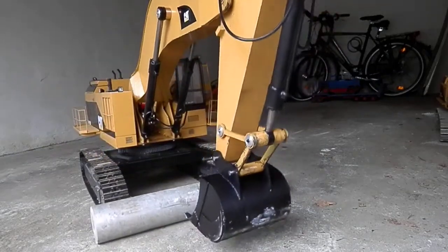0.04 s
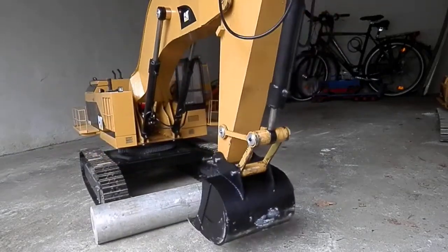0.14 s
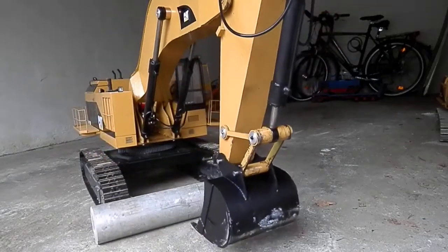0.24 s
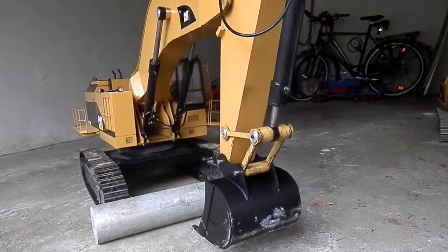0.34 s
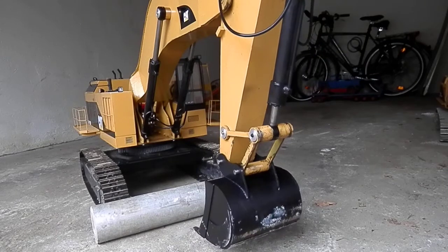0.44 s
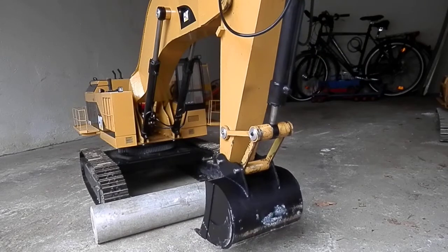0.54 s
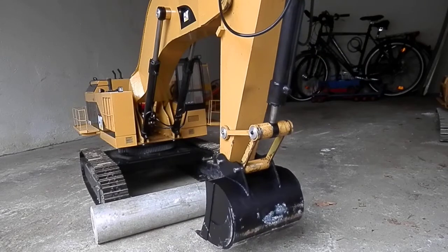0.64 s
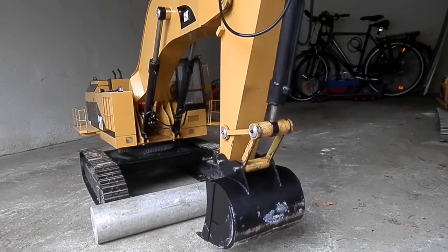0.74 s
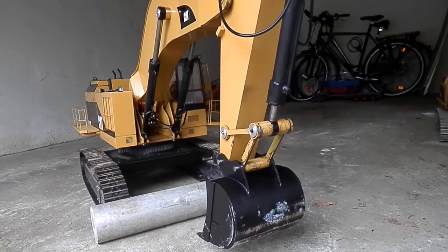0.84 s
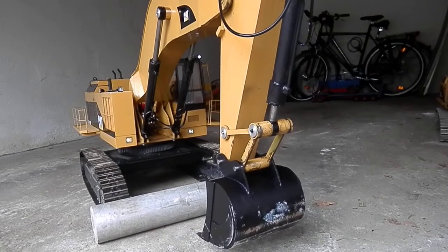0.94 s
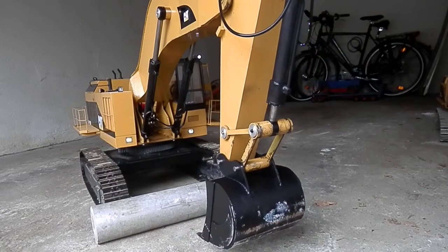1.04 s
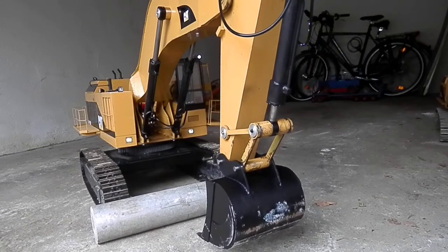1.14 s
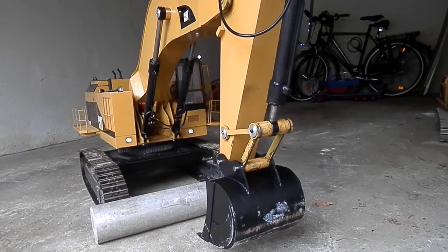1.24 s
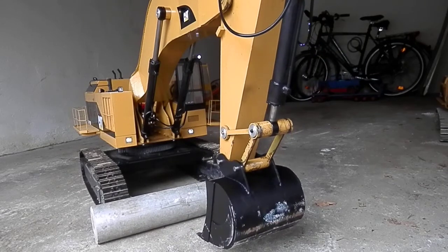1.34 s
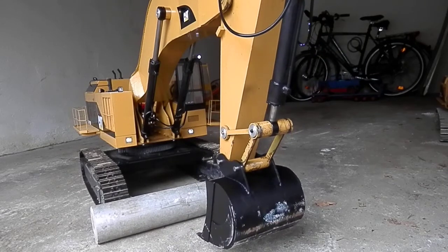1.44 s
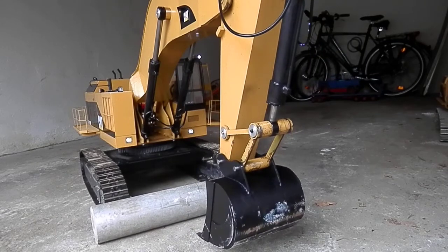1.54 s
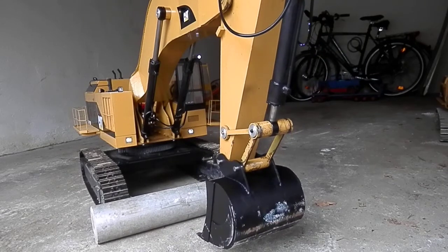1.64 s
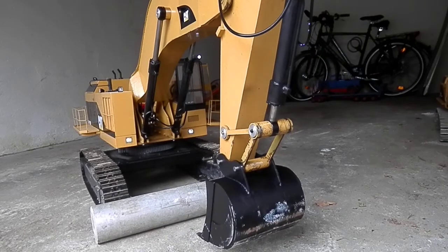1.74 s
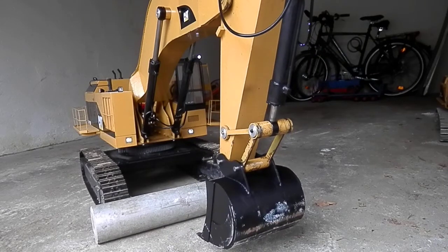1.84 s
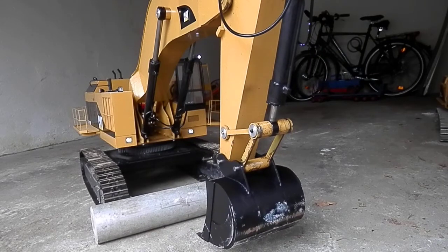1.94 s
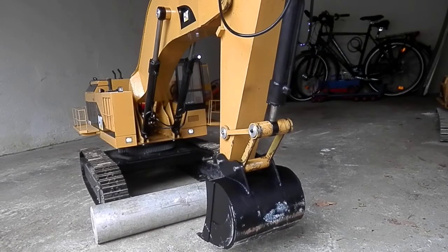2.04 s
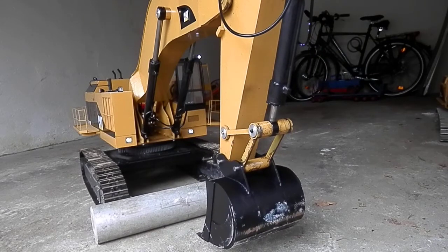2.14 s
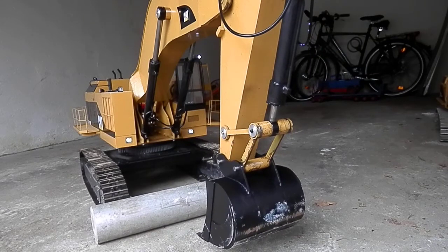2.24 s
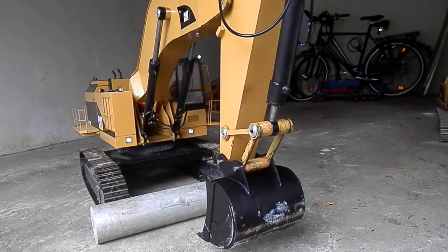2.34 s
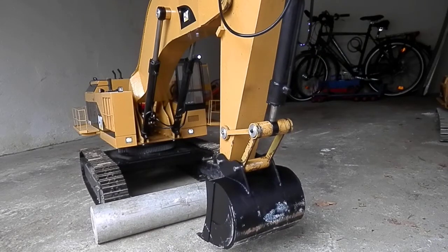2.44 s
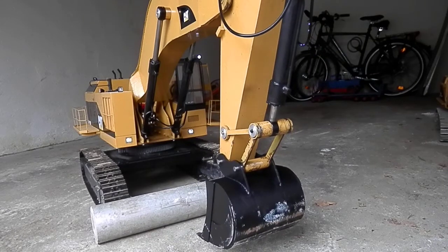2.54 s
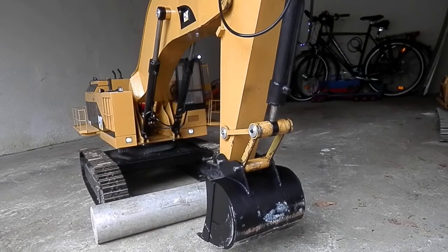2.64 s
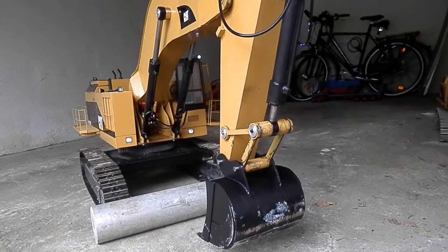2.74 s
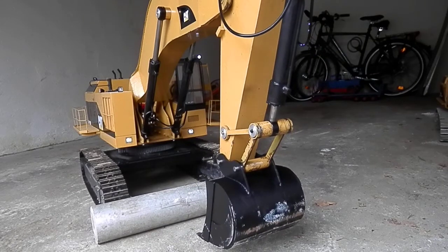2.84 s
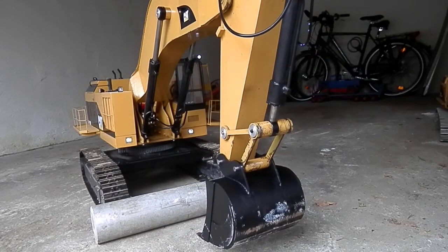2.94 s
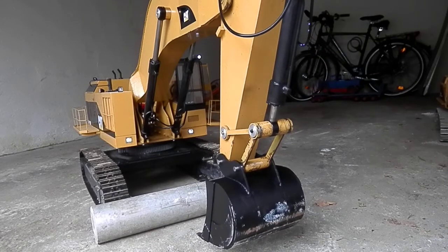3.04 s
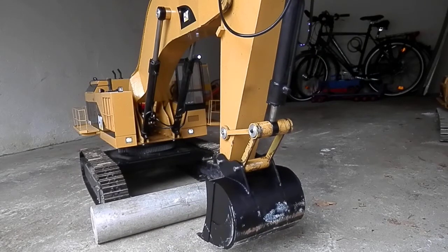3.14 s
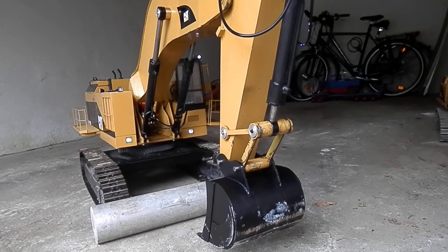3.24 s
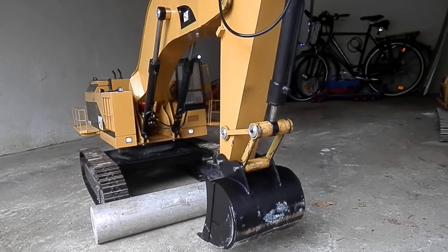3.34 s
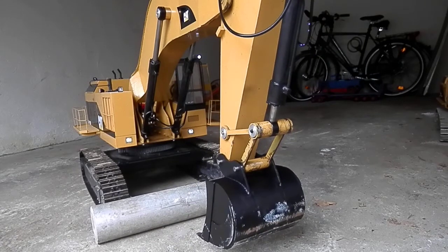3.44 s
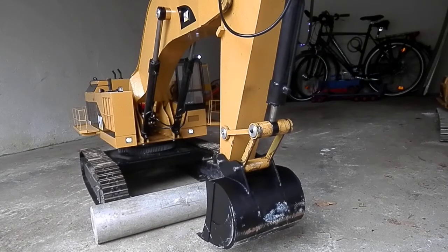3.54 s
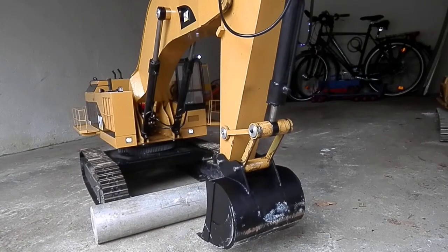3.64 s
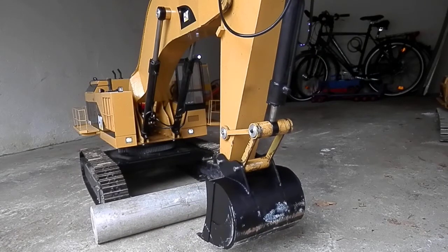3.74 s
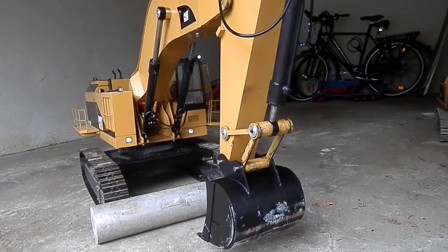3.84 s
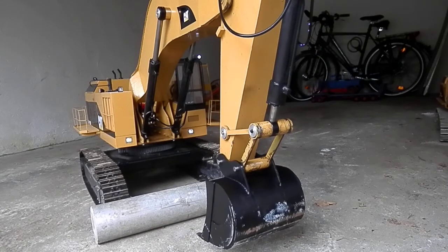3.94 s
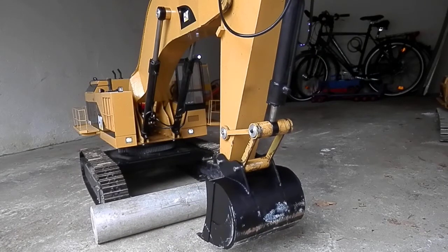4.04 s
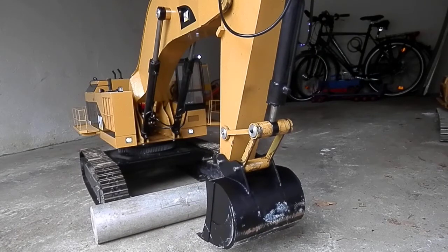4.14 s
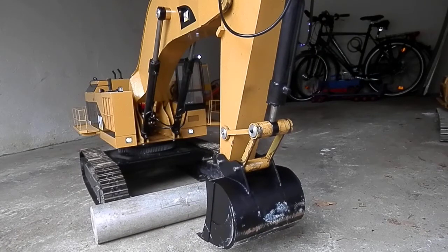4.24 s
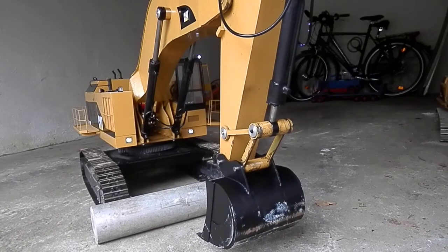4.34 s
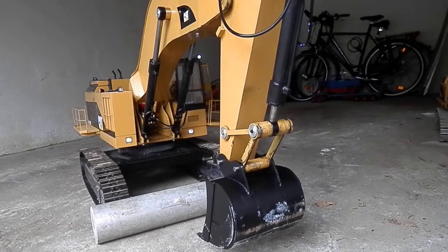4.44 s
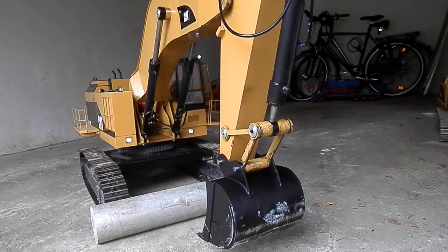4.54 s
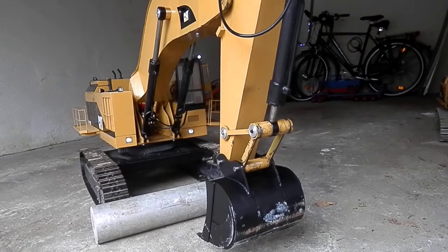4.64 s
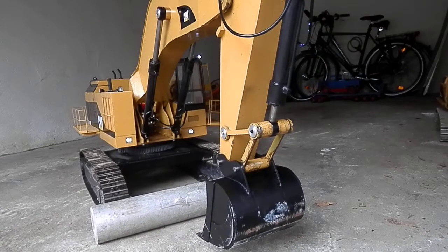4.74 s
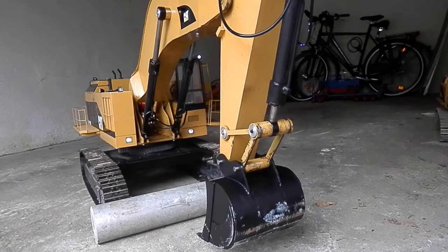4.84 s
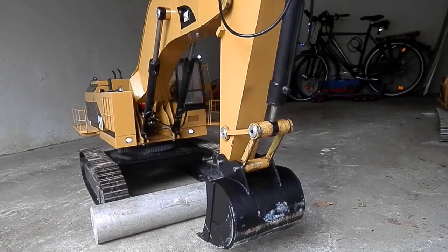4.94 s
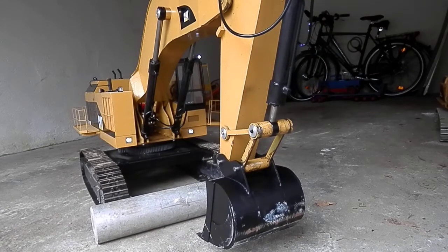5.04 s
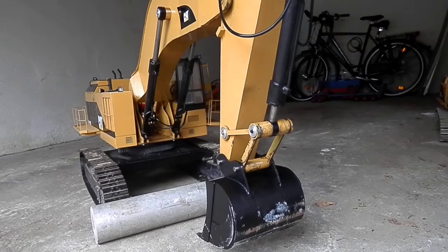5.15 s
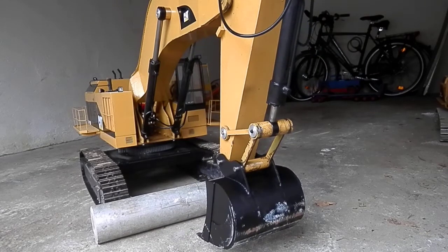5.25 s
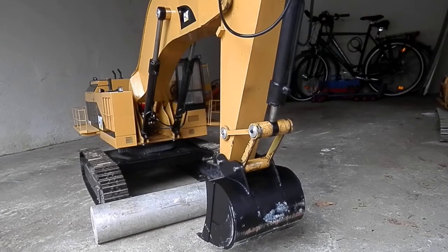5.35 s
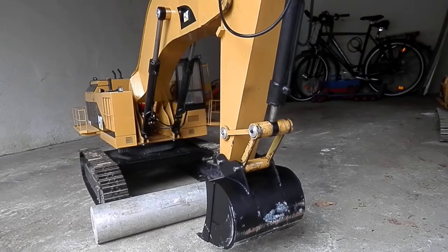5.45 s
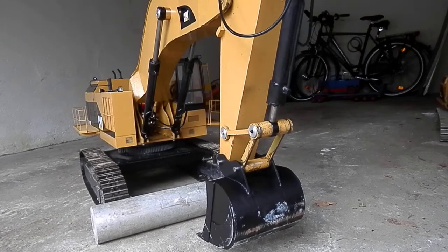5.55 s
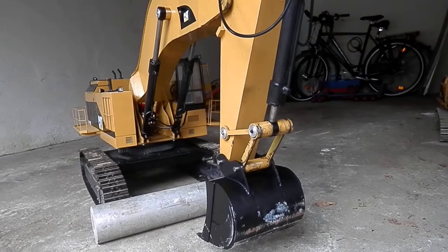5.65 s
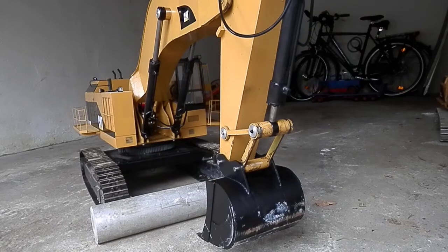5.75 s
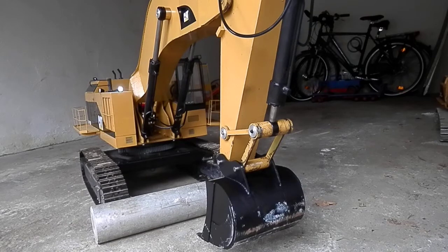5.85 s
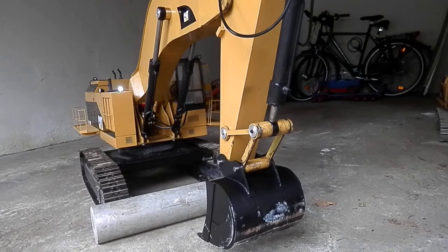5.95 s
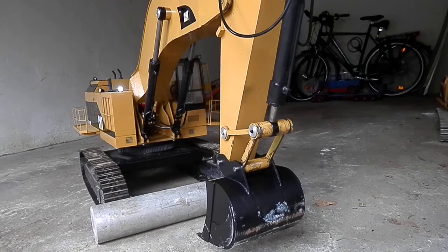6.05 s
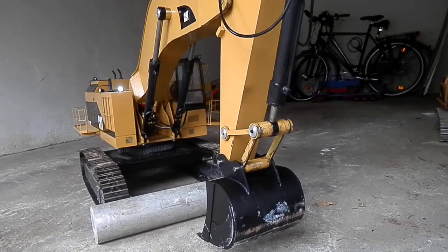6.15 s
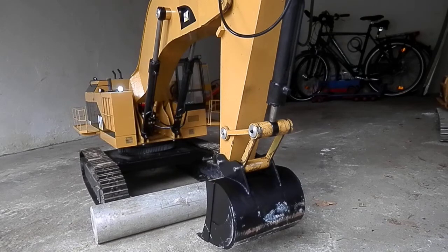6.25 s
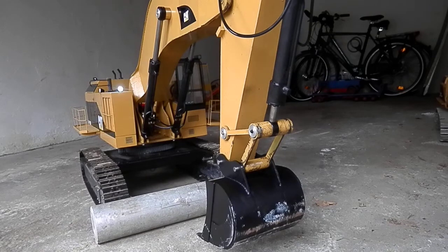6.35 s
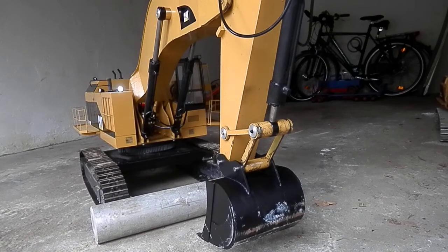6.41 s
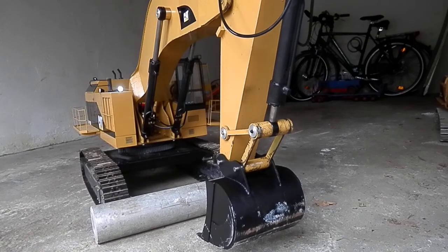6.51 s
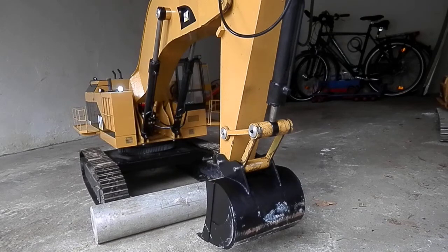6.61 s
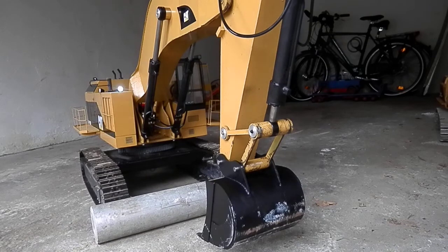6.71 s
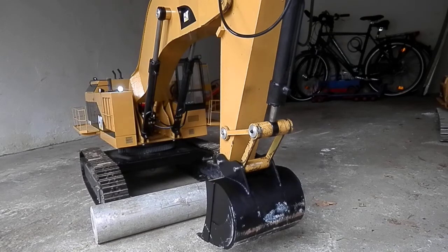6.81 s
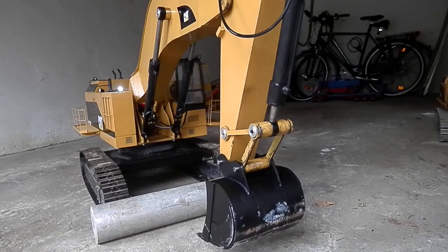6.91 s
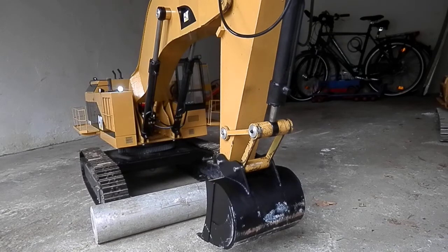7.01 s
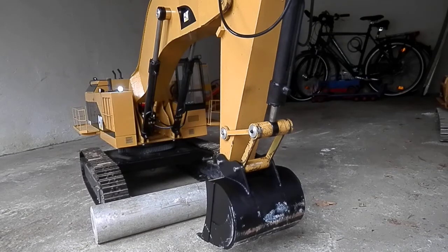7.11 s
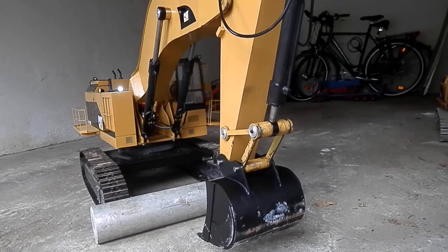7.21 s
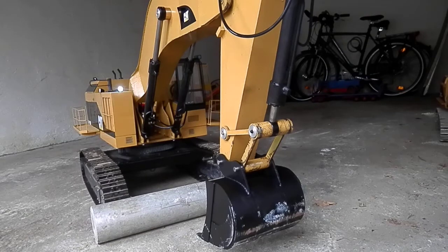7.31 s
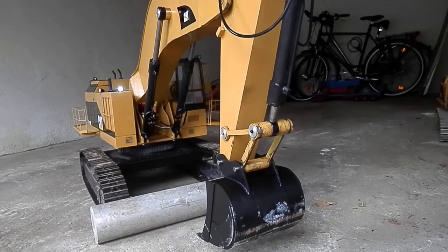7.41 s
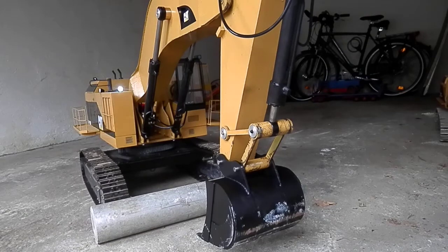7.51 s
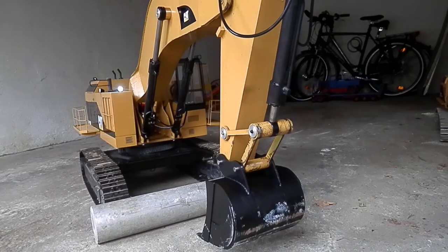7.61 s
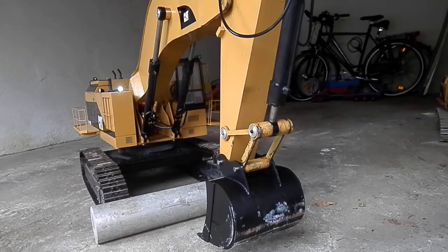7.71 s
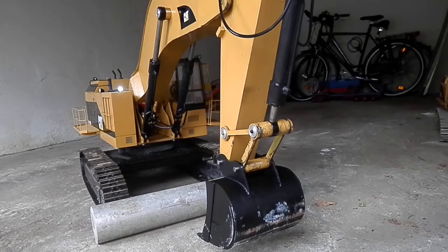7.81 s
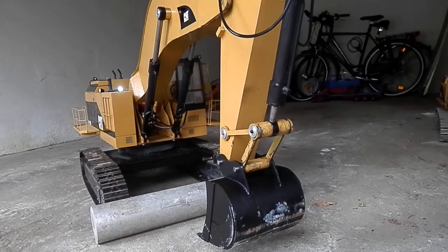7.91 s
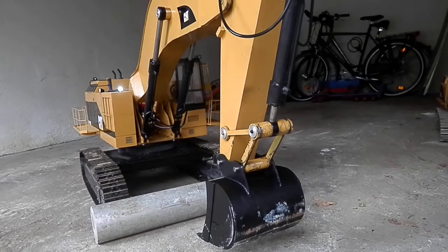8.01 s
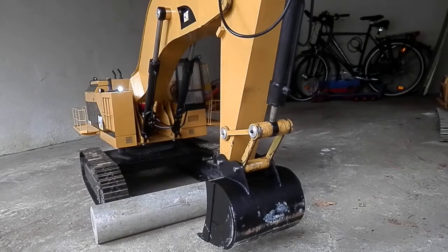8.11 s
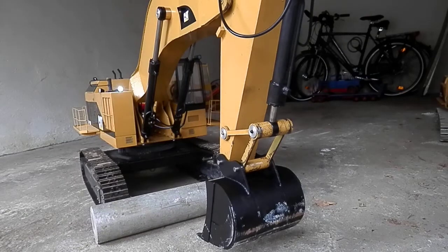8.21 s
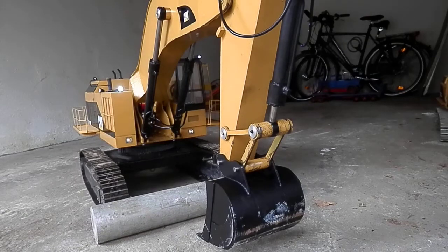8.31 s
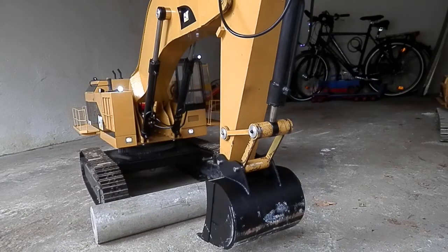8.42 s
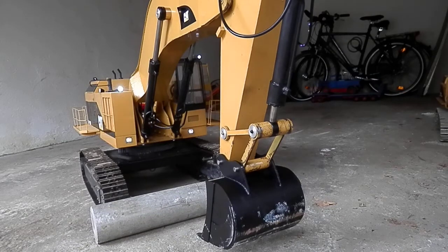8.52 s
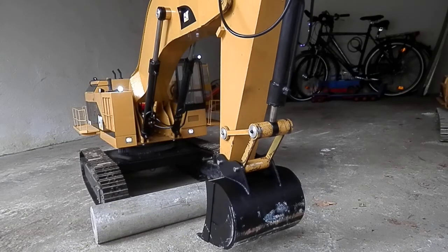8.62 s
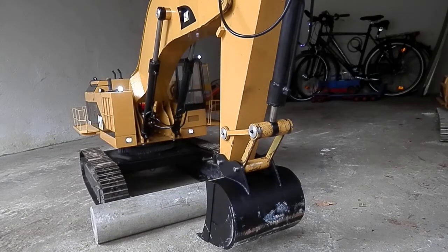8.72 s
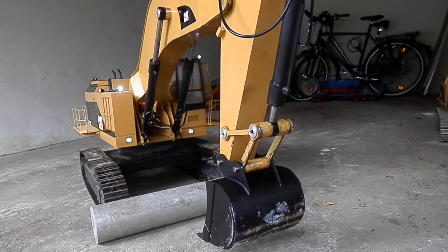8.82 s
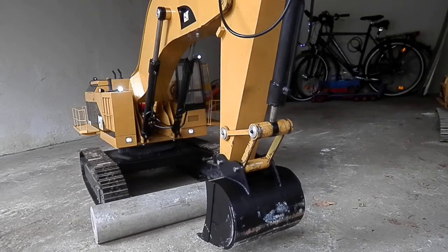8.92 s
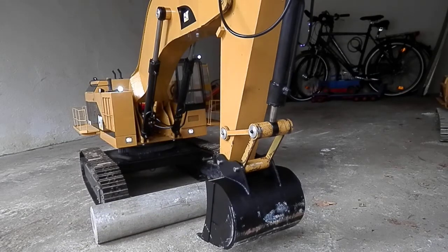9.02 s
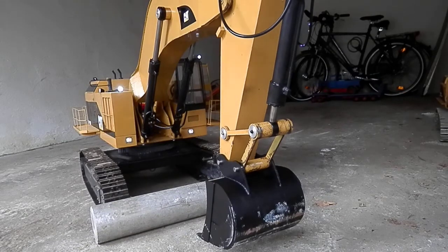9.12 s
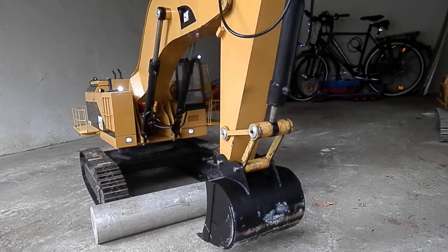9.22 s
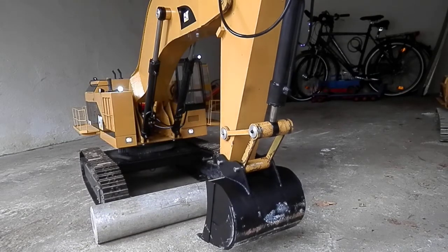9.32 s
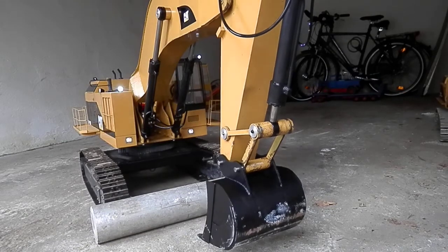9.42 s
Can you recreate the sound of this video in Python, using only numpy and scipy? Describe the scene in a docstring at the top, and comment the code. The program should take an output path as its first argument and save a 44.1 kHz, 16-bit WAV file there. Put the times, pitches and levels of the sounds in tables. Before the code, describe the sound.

A radio-controlled excavator whines and hisses, clonks once and coasts to a stop, then its cooling fan hums on under scattered light knocks.

```python
"""A bare garage, with a radio-controlled model excavator in it. Its hydraulic pump whines under load,
motor and gear tones locked to one shaft, while oil rushes and the steel bucket clonks once; then the
pump coasts to a stop. Relieved of the load, the battery lets a seven-bladed cooling fan speed up and
hum on. Light clicks, knocks and a scuff follow over a low rumble, birds chirp far away, and at the
end the pump begins to creep again."""
import sys
import numpy as np
from scipy import signal
from scipy.fft import rfft, irfft, next_fast_len
from scipy.io import wavfile
from scipy.ndimage import uniform_filter1d, minimum_filter1d

SR = 44100
rng = np.random.default_rng(int(sys.argv[2]) if len(sys.argv) > 2 else 0)


def waveform_to_disk(signal):
    """Save audio, clipped to [-1, 1], as 16-bit WAV at the path in sys.argv[1]."""
    frames = np.transpose(np.atleast_2d(signal))
    scaled = np.clip(frames, -1, 1) * 32767
    samples = np.round(scaled).astype(np.int16)
    wavfile.write(sys.argv[1], SR, samples)


N = 417627

# the load bites, the drive lets go, the valve shuts, the shaft stands, the pump creeps again
BITE_S, RELEASE_S, VALVE_SHUT_S, STANDSTILL_S, CREEP_S = 0.31, 1.098, 1.247, 1.764, 9.125
WORKING_HZ = 115.7  # pump shaft rate under load
FAN_BLADES, FAN_FREE_HZ = 7, 229.8  # blade-passing rate with the battery unloaded
# spectrum of the fan's rush and whirr: (frequency [Hz], relative level [dB])
AIR_SPECTRUM = [(115, -2), (165, -2), (270, 8), (340, 2.5), (450, -4.5), (540, -1), (670, -6), (850, -14.5),
                (1400, -24.5), (1850, -34), (2130, -30), (2350, -32.5), (2600, -33.5), (3500, -41),
                (5300, -39.5), (7500, -36), (10000, -58.5), (15000, -40)]
# bright spectrum of rubbing and snapping contacts: (frequency [Hz], relative density [dB])
CONTACT_SPECTRUM = [(880, -31), (1500, -4), (3000, 0.5), (5090, -8), (7090, -2.5), (8790, -3), (11000, -20),
                    (13400, -13.5), (15500, -12.5)]


def from_db(db):
    """Decibels to amplitude ratio."""
    return 10 ** (np.asarray(db) / 20)


def rms_one(x):
    """Normalise to rms 1."""
    return x / np.sqrt(np.mean(x ** 2) + 1e-20)


def seconds():
    """Time of every sample."""
    return np.arange(N) / SR


def since(start_s):
    """Seconds elapsed since a moment; 0 before it."""
    return np.maximum(seconds() - start_s, 0)


def ramp(start_s, length_s):
    """Linear rise from 0 to 1, then constant."""
    return np.minimum(since(start_s) / max(length_s, 1e-3), 1)


def held(start_s, end_s, attack_s, fade_db_per_s):
    """Envelope of linear attack, hold and exponential decay."""
    return ramp(start_s, attack_s) * from_db(-fade_db_per_s * since(end_s))


def decay(age, t60):
    """Exponential damping: 60 dB down after t60 seconds."""
    return np.exp(-np.log(1000) * age / t60)


def drift(rate_hz, size=N):
    """Random modulation: low-passed noise of rms 1."""
    r = np.exp(-80 * np.pi * rate_hz / SR)
    slow = signal.lfilter([1], [1, -2 * r, r * r], rng.standard_normal(size // 40 + 2002))[2000:]
    return np.interp(np.arange(size) / 40, np.arange(len(slow)), rms_one(slow))


def angle(hz):
    """Phase as the integral of frequency."""
    return 2 * np.pi * np.cumsum(hz) / SR


def noise(spectrum, low=15, high=SR / 2):
    """Spectrally shaped noise between two band edges in Hz; rms 1."""
    size = next_fast_len(N)
    hz = np.arange(1, size // 2 + 2) * SR / size
    point_hz, point_db = np.transpose(spectrum)
    gain = from_db(np.interp(np.log(hz), np.log(point_hz), point_db))
    gain /= np.sqrt((1 + (low / hz) ** 12) * (1 + (hz / high) ** 12))
    return rms_one(irfft(rfft(rng.standard_normal(size)) * gain, size)[:N])


def strikes(times, levels_db):
    """Impulsive excitation: one click for each contact."""
    out = np.zeros(N) + 1e-18
    out[(np.array(times) * SR).astype(int)] = from_db(levels_db)
    return out


def ring(clicks, hz, t60):
    """Free vibration of one mode: each impulse starts a damped sine."""
    r, w = from_db(-60 / (t60 * SR)), 2 * np.pi * hz / SR
    return signal.lfilter([0, np.sin(w)], [1, -2 * r * np.cos(w), r * r], clicks)


def resonate(x, modes):
    """Forced vibration of parallel modes: (frequency [Hz], bandwidth [Hz], peak gain [dB])."""
    out = 0
    for hz, width, db in modes:
        r = np.exp(-np.pi * width / SR)
        feedback = [1, -2 * r * np.cos(2 * np.pi * hz / SR), r * r]
        out = out + from_db(db) * signal.lfilter(np.array([1, 0, -1]) * (1 - r * r) / 2, feedback, x)
    return out


def glides(rows, warble, ragged_db, bend=1):
    """Short swelling sweeps with random frequency and amplitude modulation."""
    out, t = np.zeros(N), seconds()
    unsteady = bend + warble * drift(70)
    for s, length, start_hz, end_hz, db in rows:
        span = np.flatnonzero((t > s) & (t < s + length))
        hz = np.linspace(start_hz, end_hz, len(span)) * unsteady[span]
        out[span] += from_db(db) * np.hanning(len(span)) * np.sin(angle(hz))
    return np.sqrt(2) * out * from_db(ragged_db * (drift(55) - 1 / 2))


def garage(x, wet_db, t60=0.37):
    """Reverberation: the power is shared between direct sound and a diffuse tail from the bare walls."""
    t = np.arange(SR // 2) / SR
    tail = rng.standard_normal(len(t)) * decay(t, t60) * (t > .004)
    wet = signal.fftconvolve(x, tail / np.linalg.norm(tail))[:N]
    return (x + from_db(wet_db) * wet) / np.sqrt(1 + from_db(wet_db) ** 2)


def rumble(start_db=-51.5, growth_db_per_s=0.52, swell_db=1):
    """Low room noise slowly grows, and soft bumps excite one booming mode."""
    # floor thuds: (time [s], level [dB])
    thuds = [(6.579, -39.5), (7.571, -33), (7.871, -37.5)]
    # room noise: (frequency [Hz], relative density [dB])
    spectrum = [(20, -5), (35, 6), (47, -3.5), (68, 0.5), (90, -1), (120, -2.5)]
    level_db = start_db + growth_db_per_s * seconds() + swell_db * drift(3)
    boom = ring(strikes(*np.transpose(thuds)), hz=65, t60=1.0)
    return from_db(level_db) * noise(spectrum, 12, 120) + boom


def birds(faint_count=6, faint_hz=4170, faint_s=.2, faint_db=-81, spread=0.087, syllables_per_s=26):
    """Distant chirps, modulated into swooping syllables; reverberation outweighs the direct sound."""
    # nearer chirps: (time [s], length [s], start pitch [Hz], end pitch [Hz], level [dB])
    chirps = [(2.2, 0.21, 3794, 3660, -81), (2.48, 0.24, 4280, 4480, -70), (2.8, 0.13, 4160, 4270, -75),
              (2.92, 0.29, 4390, 4700, -73), (3.28, 0.17, 4080, 3960, -80), (4.14, 0.15, 7420, 7100, -77),
              (4.36, .15, 7200, 6980, -79), (5.57, .12, 4350, 4570, -72), (5.856, 0.16, 4970, 5630, -73.5),
              (6.26, .2, 4100, 4900, -74.5), (6.8, 0.38, 4430, 4650, -77), (7.37, 0.14, 6400, 7080, -66),
              (7.58, 0.19, 6680, 6470, -66), (7.981, 0.29, 3150, 3120, -77), (8.46, 0.16, 8330, 8500, -76)]
    twitter = []
    for when, start, end in rng.uniform(-0.71, 1, (faint_count, 3)):
        start_hz, end_hz = faint_hz * (1 + spread * start), faint_hz * (1 + spread * end)
        twitter.append((abs(when) * (N / SR - faint_s), faint_s, start_hz, end_hz, faint_db))
    syllable = angle(syllables_per_s * (1 + .45 * drift(12)))
    song = glides(chirps + twitter, warble=.03, ragged_db=4, bend=1 + .035 * np.sin(syllable))
    return garage(song * rms_one(1.4 + np.cos(syllable)), wet_db=5)


def scuff(level_db=-57.5, grain_db=2):
    """Sliding friction gives a short, grainy burst of bright noise."""
    rub = held(start_s=4.984, end_s=5.18, attack_s=0.0051, fade_db_per_s=150)
    return rub * from_db(level_db + grain_db * drift(120)) * noise(CONTACT_SPECTRUM, low=1213)


def knocks(hard_blow_db=-23, crack_growth=0.45, relative_width=0.044, rise_s=0.0009, rattle_db=2.0):
    """Impact noise: each contact snaps, rattles in four bands and leaves a damped resonance ringing."""
    # impacts: (time [s], body [dB], clack [dB], tick [dB], ring pitch [Hz], ring level [dB])
    impacts = [(0.455, -34.5, -43, -52, 1050, -17.5), (1.232, -43, -48, -42.5, 950, -35.5),
               (4.987, -53, -70, -55, 7940, -62), (5.099, -55, -59, -52, 7500, -64),
               (5.139, -58, -64, -61, 2600, -64), (5.294, -65, -68, -55.5, 6700, -57),
               (5.38, -47, -57.5, -60, 1300, -53), (5.399, -37.5, -61, -56, 650, -44),
               (5.431, -48, -54, -56, 9300, -59), (5.494, -57, -49, -52.5, 1930, -58),
               (5.513, -55, -72, -70, 9260, -66), (5.768, -50, -64, -53.5, 7400, -65),
               (6.038, -55.5, -58.5, -54, 6940, -52), (6.46, -37.5, -60.5, -73.5, 1115, -58),
               (7.506, -32, -50, -54, 746, -42), (7.523, -28.5, -51, -48, 1155, -46),
               (7.546, -40, -51.5, -48.5, 800, -40), (7.864, -42.5, -65, -62, 1180, -60),
               (7.875, -59, -69, -66, 5900, -63), (7.887, -55, -72, -68, 4900, -66),
               (7.956, -51, -53.5, -57.5, 2290, -56), (8.236, -63.5, -64.5, -63, 7400, -66),
               (8.262, -58, -64.5, -62.5, 3750, -62), (8.302, -58, -63.5, -62.5, 7670, -62),
               (8.576, -51, -73, -62, 5500, -64), (8.73, -43, -59, -55.5, 7900, -53),
               (8.985, -53, -67, -64.5, 7700, -67), (9.183, -41.5, -56, -70, 1200, -60)]
    # impact noise: (frequency [Hz], relative density [dB])
    spectrum = [(60, -0.5), (300, 17.5), (650, 15), (1200, 2), (2200, 0), (4000, -9), (5500, -11.5),
                (7200, -6.5), (10000, -20), (15000, -40.5)]
    bands = [noise(spectrum, 160, 1500) * from_db(1), noise(spectrum, 1400, 4500),
             noise(spectrum, 5000), noise(CONTACT_SPECTRUM, 11500) * from_db(-4)]
    snap = from_db(-3) * noise(CONTACT_SPECTRUM, 3000)
    out = np.zeros(N)
    for s, body, clack, tick, ring_hz, ring_db in impacts:
        span = np.arange(int(s * SR), min(N, int(s * SR) + SR // 2))
        age = (span - span[0]) / SR
        crack = tick + crack_growth * (body - hard_blow_db)  # harder blows are brighter
        burst = sum(from_db(db) * band[span] for db, band in zip((body, clack, tick, crack), bands))
        mode = resonate(rng.standard_normal(len(age)), [(ring_hz, relative_width * ring_hz, 0)])
        tone = from_db(ring_db) * rms_one(mode)
        attack = 1 - np.exp(-age / rise_s)
        out[span] += from_db(tick) * snap[span] * decay(age, t60=0.026)
        out[span] += attack * (burst * decay(age, t60=0.11) + tone * decay(age, t60=0.099))
    return garage(out * from_db(rattle_db * drift(220)), wet_db=-1.5)


def whirr(shaft, low_hz=380, uneven_db=6.0, count=90, size=4096):
    """Periodic friction: the fan motor rubs alike on every turn, giving a comb of harmonics; rms 1."""
    hz, db = np.transpose(AIR_SPECTRUM)
    order_hz = np.maximum(np.arange(count), 1) * FAN_FREE_HZ / FAN_BLADES
    order_db = np.interp(np.log(order_hz), np.log(hz), db) + uneven_db * rng.uniform(-1.8, 1, count)
    gains = from_db(order_db) * (order_hz > low_hz)
    one_turn = irfft(gains * np.exp(2j * np.pi * rng.random(count)), size)
    position = shaft / (2 * np.pi) % 1
    return rms_one(np.interp(position, np.arange(size + 1) / size, np.append(one_turn, one_turn[0])))


def blade_level(blade_hz, loaded_db=-49.5, peak_hz=213.7, peak_width_hz=2.4, peak_db=6):
    """Envelope in dB of the blade tone: it swells, peaks briefly as its pitch rises, and later dips."""
    # dips of the hum: (time [s])
    dip_times = [2.95, 5.76, 6.75, 7.29, 8.05, 9.43]
    swell_db = 15 * ramp(start_s=1.76, length_s=0.33)
    boost_db = peak_db / (1 + (2 * (blade_hz - peak_hz) / peak_width_hz) ** 2)
    dip_db = sum(3.5 * np.exp(-((seconds() - s) / 0.015) ** 2) for s in dip_times)
    return loaded_db + swell_db + boost_db - dip_db


def fan(loaded_hz=194.5, recovery_s=1.48, lag_s=.54, wobble=.002):
    """The blade-passing tone rises as the battery recovers, over shaft harmonics, whirr and air rush."""
    # fan partials: (shaft order [1], relative level [dB])
    orders = [(1, -28), (2, -22.5), (3, -26.5), (4, -25), (6, -24.5), (7, 0), (8, -14.5), (13, -27.5),
              (14, -33.5), (16, -34.5), (20, -32.5), (21, -37), (65, -56.5), (78, -56.5)]
    # bearing tones: (frequency [Hz], level [dB])
    bearing_tones = [(533, -70.5), (1076, -73)]
    harmonics_db, whirr_db, air_db = -34.5, -57, -47
    blade_hz = FAN_FREE_HZ + (loaded_hz - FAN_FREE_HZ) * np.exp(-since(recovery_s) / lag_s)
    shaft = angle(blade_hz * (1 + wobble * drift(8))) / FAN_BLADES
    hum = 0
    for order, db in orders:
        if order == FAN_BLADES:
            level_db = blade_level(blade_hz) + 0.97 * drift(10)
        else:
            level_db = harmonics_db + 3 * drift(4)
        hum = hum + from_db(level_db + db) * np.sin(order * shaft + rng.uniform(0, 2 * np.pi))
    for hz, db in bearing_tones:
        hum = hum + from_db(db + 3 * drift(7.2)) * np.sin(angle(hz * (1 + wobble * drift(11))))
    rush = from_db(whirr_db) * whirr(shaft) + from_db(air_db) * noise(AIR_SPECTRUM, low=100)
    return np.sqrt(2) * hum + rush


def bucket(rolloff_db_per_octave=18.5):
    """Modal ringing of the steel bucket: each contact excites the modes near its own pitch most."""
    # contacts of one clonk: (time [s], level [dB], favoured frequency [Hz])
    contacts = [(0.6085, -26, 510), (0.6217, -28, 490), (0.637, -28, 465)]
    # bucket modes: (frequency [Hz], relative level [dB], t60 [s])
    modes = [(460, 0, 0.3), (530, 0, 0.16), (636, -2, 0.1199), (727, -5, 0.25), (926, 2, 0.16)]
    times, contact_db, favoured_hz = np.transpose(contacts)
    rings = 0
    for hz, db, t60 in modes:
        mismatch_db = rolloff_db_per_octave * abs(np.log2(hz / favoured_hz))
        rings = rings + ring(strikes(times, contact_db + db - mismatch_db), hz, t60)
    return garage(rings, wet_db=-12.5)


def oil(pipe_db=-8, grain_db=2.0, shut_s=0.0093, fade_db_per_s=78, swell_db_per_s=24):
    """Flow noise: oil rushes through the valve and rings the pipes, drains away, then seeps again."""
    # flow bands: (low edge [Hz], high edge [Hz], loaded level [dB], drop as the valve shuts [dB],
    # start of fade [s], level at the start of the creep [dB])
    bands = [(242, 1100, -43, 3.5, 1.743, -68), (1070, 5400, -35.5, 4, 1.583, -68),
             (4800, 19920, -35, 5.5, 1.47, -68.5)]
    # flow noise: (frequency [Hz], relative density [dB])
    spectrum = [(250, -3.5), (500, -6), (700, 0.5), (1150, 5), (1650, 2.5), (2200, 6.5), (2750, -2.5),
                (3500, -4), (4400, 4.5), (4900, -11), (5600, -3), (7600, -0.5), (10200, -22),
                (15500, -24.5)]
    # pipe resonances: (frequency [Hz], bandwidth [Hz], gain [dB])
    pipes = [(2416, 100, -2.5), (4030, 20, -5), (5580, 41, -1.5)]
    out = 0
    for low_hz, high_hz, db, drop_db, fade_s, creep_db in bands:
        working = from_db(db - drop_db * ramp(VALVE_SHUT_S, shut_s) - fade_db_per_s * since(fade_s))
        creeping = ramp(CREEP_S, 0.032) * from_db(creep_db + swell_db_per_s * since(CREEP_S))
        rush = noise(spectrum, low_hz, high_hz)
        if low_hz < pipes[0][0] < high_hz:
            rush = rush + from_db(pipe_db) * rms_one(resonate(rng.standard_normal(N), pipes))
        out = out + (working + creeping) * rush
    return out * from_db(grain_db * drift(150))


def rasp(slips_per_s=140, level_db=-49, top_hz=1800, attack_s=0.11, uneven_db=3):
    """Stick-slip friction: the creeping gears move in soft, uneven jerks that ring the pump body."""
    # pump body modes: (frequency [Hz], bandwidth [Hz], gain [dB])
    modes = [(430, 37, 14), (545, 33, 0), (800, 48, -11), (1110, 58, -18), (1420, 90, -15)]
    first = int(CREEP_S * SR)
    slipping = rng.random(N - first) < slips_per_s / SR
    slips = slipping * from_db(uneven_db * rng.standard_normal(N - first))
    softened = signal.sosfilt(signal.butter(2, top_hz, fs=SR, output="sos"), slips + 1e-18)
    body = np.pad(rms_one(resonate(softened, modes)), (first, 0))
    return from_db(level_db) * ramp(CREEP_S, attack_s) * body


def squeaks_and_ring():
    """Short gliding squeaks and a thin, steady pipe resonance sound as the pump stops and restarts."""
    # squeaks and pipe ring: (time [s], length [s], start pitch [Hz], end pitch [Hz], level [dB])
    sweeps = [(1.255, .12, 2620, 2270, -36), (1.395, .085, 1180, 1020, -37), (1.485, .1, 2620, 2280, -35.5),
              (1.5, .09, 1150, 1030, -44), (1.58, .07, 1530, 1410, -42), (1.4, .55, 4400, 4380, -60),
              (1.91, .09, 3600, 3200, -72), (2.0, .13, 4420, 4380, -76), (2.12, .11, 4330, 4270, -72),
              (9.132, .035, 3950, 3880, -64), (9.1, .5, 4370, 4380, -68.5), (9.22, .3, 520, 550, -52),
              (9.24, .1, 1330, 1130, -62)]
    return garage(glides(sweeps, warble=0.0018, ragged_db=1.5), wet_db=-6)


def shaft_speed(coast_hz_per_s=170, restart_s=9.41, run_up_hz_per_s=400):
    """Shaft rate in Hz: it sags under load, falls to rest under constant friction, then runs up."""
    # driven shaft: (time [s], rotation rate [Hz])
    loaded_shaft = [(0, 136.3), (.11, 127.5), (.2, 123.3), (.35, 117.3), (.46, 115.7), (.64, 115.7),
                    (.79, 114.6), (.9, 112.1), (1.09, 111), (1.2, 96)]
    driven_hz = np.interp(seconds(), *np.transpose(loaded_shaft))
    coasting_hz = coast_hz_per_s * (STANDSTILL_S - seconds())
    return np.clip(coasting_hz, 0, driven_hz) + run_up_hz_per_s * since(restart_s)


def switching(shaft, shaft_hz, switching_hz=7782, rise_hz=75, poles=10, wobble=0.0005):
    """Modulation: the poles put sidebands on the controller's tone, closing in as the motor slows."""
    # spells of driving, letting go, braking, creeping and starting:
    # (start [s], end [s], carrier [dB], sidebands [dB], octave [dB])
    spells = [(0, 1.12, -50, -61, -92), (1.122, 1.17, -38, -51, -97), (1.165, 1.24, -38, -35.5, -83),
              (1.28, 1.624, -49, -36, -70), (9.14, 9.47, -93, -110, -70.5), (9.428, 9.47, -62, -50.5, -83)]
    carrier_gain, side_gain, octave_gain = sum(
        np.outer(from_db(levels_db), held(start_s, end_s, attack_s=.02, fade_db_per_s=196))
        for start_s, end_s, *levels_db in spells)
    carrier_hz = switching_hz + rise_hz * np.maximum(1 - shaft_hz / WORKING_HZ, 0)
    carrier = angle(carrier_hz * (1 + wobble * drift(22)))
    sidebands = sum(from_db(db) * np.sin(carrier + order * poles * shaft)
                    for order, db in [(-1, 0), (1, -13), (2, -24)])
    partials = side_gain * sidebands + octave_gain * np.sin(2 * carrier)
    return carrier_gain * np.sin(carrier) + garage(partials, wet_db=-3)


def gear_tones(gear_angle, partials, flutter_db, rattle_db, settle_s=0.15):
    """Whole shaft harmonics, weighted by the load; each flutters alone and all rattle together."""
    unloaded, released = 1 - ramp(BITE_S - settle_s, settle_s), ramp(RELEASE_S, settle_s)
    stop = int(STANDSTILL_S * SR)
    out = np.zeros(N)
    for order, db, unloaded_db, released_db in partials:
        level_db = db + unloaded_db * unloaded[:stop] + released_db * released[:stop]
        level_db += flutter_db * drift(30, size=stop)
        out[:stop] += from_db(level_db) * np.sin(round(order) * gear_angle[:stop])
    return out * from_db(rattle_db * drift(120))


def gears(shaft, shaft_hz, speed_power=1.4, mesh_db=-35.5, backlash=.0025, fade_db_per_s=62.5):
    """Gear meshing: nine teeth give shaft harmonics that grow with speed and excite resonances."""
    # tooth-passing harmonics:
    # (shaft order [1], loaded level [dB], change before the bite [dB], change after release [dB])
    tooth_orders = [(9, -32.5, -2, 2), (18, -38.5, 1, 1), (27, -48.5, -0.5, -2.5), (36, -32.5, -11.5, -12)]
    # weaker orders from uneven teeth: same columns, levels relative to mesh_db
    mesh_orders = [(2, -15.5, 6, -11.5), (3, -21, 10, -2.5), (4, -22.5, -4, -5.5), (5, -25, 7, -11),
                   (7, -24, -0.5, -2.5), (8, -19, 3, -10.5), (10, -10.5, -4, -0.5), (11, -19, 15.5, -8.5),
                   (12, -17, 0.5, -7.5), (13, -14.5, 0.5, -5.5), (16, -18.5, 3.5, -1), (17, -17, 6, -1.5),
                   (19, -14, -0.5, 3.5), (20, -12.5, 0.5, 4), (33, -22, -7.5, -1.5), (41, -28.5, 19.5, 1.5),
                   (45, -17.5, 3.5, -1.5), (49, -12, -10, -0.5), (52, -17, 11, 2), (55, -7.5, 2.5, -3),
                   (57, -15.5, -5, -1), (63.3, -17.5, -5, -5), (72.27, -19, -2.5, 2.5)]
    # the housing's ring near 800 Hz, excited by the teeth: (frequency [Hz], bandwidth [Hz], gain [dB])
    housing_ring = [(802, 45, 1)]
    # resonances that colour the gear tones, a low room boom and the pump's ringing: same columns
    resonances = [(276.2, 13, 8.5), (785, 39, 12.5), (1100, 80, 2.5), (2280, 360, -7), (4000, 840, 0)]
    # the teeth chatter at release and run slack once the valve is shut
    chatter_db = 4.5 * held(RELEASE_S, RELEASE_S + 0.044, attack_s=0.026, fade_db_per_s=404.5)
    slack_db = 3 * ramp(VALVE_SHUT_S, 0.078)
    effort = from_db(chatter_db - slack_db) * (shaft_hz / WORKING_HZ) ** speed_power
    fade = from_db(-fade_db_per_s * since(VALVE_SHUT_S))
    teeth = gear_tones(shaft, tooth_orders, flutter_db=2.6, rattle_db=2.2)
    teeth = garage((teeth + resonate(teeth, housing_ring)) * effort * fade, wet_db=-4)
    # backlash lets the gears rattle around the motor's angle
    loose_angle = shaft + angle(shaft_hz * backlash * drift(70))
    mesh = from_db(mesh_db) * effort * gear_tones(loose_angle, mesh_orders, flutter_db=4, rattle_db=2.5)
    return teeth + garage(mesh + resonate(mesh, resonances), wet_db=-1)


def whine(shaft, closing_s=0.046, shut_drop_db=26, fade_db_per_s=90, throb_hz=26.7):
    """Magnetic ripple sings as two throbbing tones that surge with pressure until the valve shuts."""
    # motor tones: (shaft order [1], loaded level [dB], rise at the bite [dB], drop at release [dB],
    # surge as the valve closes [dB])
    tones = [(47, -24.5, 9, 5, 15.5), (51, -23.5, 3.5, 12, 13)]
    unloaded, released = 1 - ramp(BITE_S, 0.0582), ramp(RELEASE_S, 0.02)
    pressure = ramp(VALVE_SHUT_S - closing_s, closing_s)
    loss_db = shut_drop_db * ramp(VALVE_SHUT_S, 0.014) + fade_db_per_s * since(VALVE_SHUT_S)
    throb_db = 2 * np.sin(angle(throb_hz * (1 + .2 * drift(13))))
    out = 0
    for order, db, bite_db, drop_db, surge_db in tones:
        level_db = db - bite_db * unloaded - drop_db * released + surge_db * pressure - loss_db
        flutter_db = 1.5 * drift(67) + 1.9 * drift(250)
        out = out + from_db(level_db + throb_db + flutter_db) * np.sin(order * shaft)
    return garage(out, wet_db=-6)


def pump(jitter=0.0028):
    """Phase locking: gear tones, motor whine and switching sidebands follow one unsteady shaft."""
    shaft_hz = shaft_speed()
    shaft = angle(shaft_hz * (1 + jitter * drift(90)))
    return np.sqrt(2) * (gears(shaft, shaft_hz) + whine(shaft) + switching(shaft, shaft_hz))


def scene():
    """Superposition of the machine and the small sounds around it, in mono."""
    machine = pump() + squeaks_and_ring() + rasp() + oil() + fan() + bucket()
    return (machine + knocks() + scuff() + rumble() + birds())[None]


def record(dry):
    """Peak limiting, followed by a steep low-pass filter."""
    ceiling, hold_s, cutoff_hz = .35, .006, 15800
    hold = int(hold_s * SR)
    needed_gain = ceiling / np.maximum(abs(dry), ceiling)
    gain = uniform_filter1d(minimum_filter1d(needed_gain, hold), hold)
    return signal.sosfilt(signal.ellip(10, .1, 80, cutoff_hz, fs=SR, output="sos"), dry * gain)


dry = scene()
out = record(dry)
waveform_to_disk(out)
```